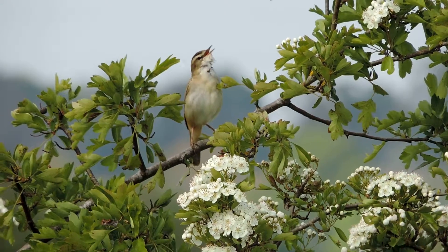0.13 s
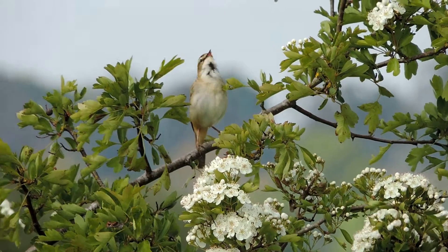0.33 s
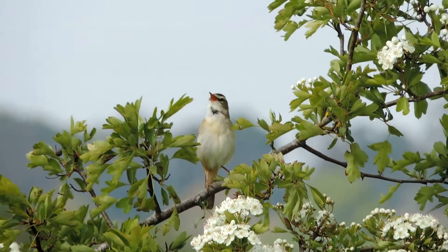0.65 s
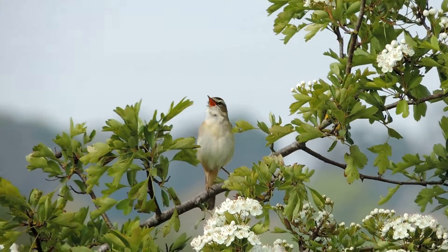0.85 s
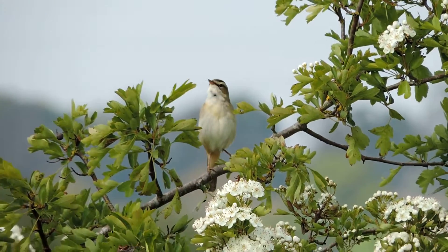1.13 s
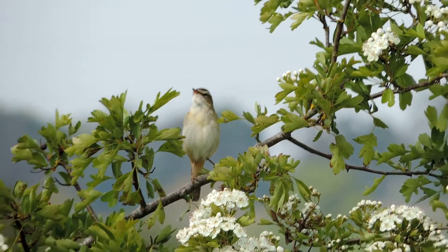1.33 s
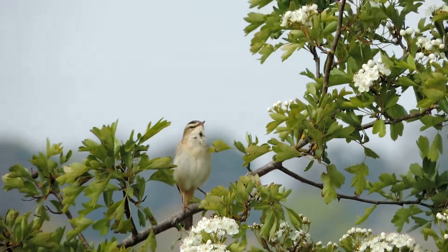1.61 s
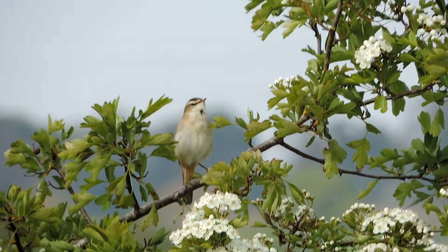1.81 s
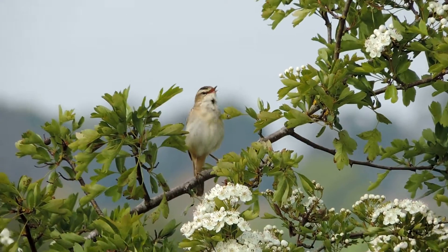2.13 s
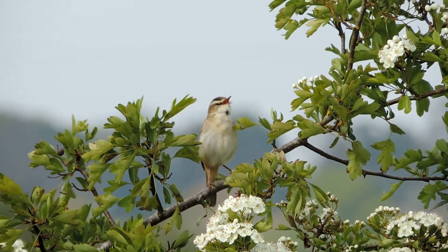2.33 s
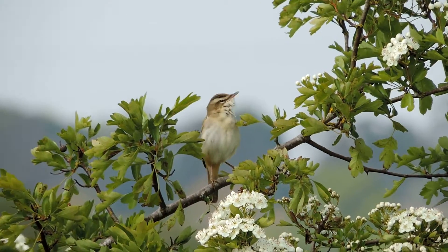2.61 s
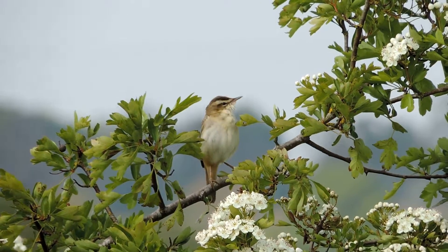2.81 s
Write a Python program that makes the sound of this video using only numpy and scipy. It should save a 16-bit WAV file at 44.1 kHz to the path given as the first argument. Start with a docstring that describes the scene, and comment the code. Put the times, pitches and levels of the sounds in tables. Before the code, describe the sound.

A small perched bird sings close by: falling chirps, then dry, harsh rattling bursts, a clear rising whistle and nasal notes. Low wind buffets the stereo microphone, stronger on the right, over faint far birds and soft hiss.

```python
"""On a bush in open fields a small bird sings rattles of harsh bursts, nasal notes, falling chirps and a whistle.
Rattles are uneven pulses and breath through open- and closed-beak filters; the other notes are gliding sines.
Far birds trill, pipe and peep, and long low calls and hoots drift over the fields, also as sines.
Filtered noise makes the wind that buffets two microphone ports, the right one most, and a soft country hiss."""
import sys
import numpy as np
from scipy import signal
from scipy.fft import rfft, irfft
from scipy.io import wavfile
from scipy.ndimage import uniform_filter1d

SR = 44100
rng = np.random.default_rng(int(sys.argv[2]) if len(sys.argv) > 2 else 0)


def volts_from_db(level):
    """Convert decibel levels to linear amplitude ratios."""
    exponent = np.asarray(level, float) / 20
    return 10 ** exponent


def output_pcm(signal):
    """Save a mono or channel-first signal as 16-bit PCM at the path in sys.argv[1].

    Samples are clipped to [-1, 1] before scaling.
    """
    pcm = np.clip(np.atleast_2d(signal).T, -1, 1) * 32767
    wavfile.write(sys.argv[1], SR, np.round(pcm).astype(np.int16))


N = 130095
T = np.arange(N) / SR
F = np.maximum(np.arange(N // 2 + 1) * SR / N, 1)

# Rattles. Each row: start in seconds, stretch of the gaps, level in dB before a common trim,
# first burst in dB re the rest, beak opening at the fourth burst (0-1), second-voice pitch in Hz.
RATTLES = [(.466, 1.07, -46.5, -1.5, 0.06, 5690), (.632, 0.94, -46, -7, 0.6, 6020),
           (1.024, 0.93, -48.5, -20, 0.52, 6090), (1.206, 0.97, -48.5, -8, 0.36, 6200),
           (1.734, 0.95, -50.5, -11, 0.55, 6290), (2.074, 0.98, -49, -20, 0.74, 6200),
           (2.291, 1.01, -50, -9, 0.08, 6150), (2.5041, 0.91, -49, -9, 0.1, 6400),
           (2.7154, 1.08, -50, -16, 0.16, 6440)]
# Burst starts within one rattle, in seconds before the stretch.
RATTLE_BURSTS = [0, .014, .029, .049, .072]
# Throat filters, beak open and beak closed. Each row: frequency in Hz, relative gain in dB.
OPEN_THROAT = [(1500, -11), (4000, -9), (4750, 1), (6200, -2), (8400, -8.5), (9300, -24), (11900, -19),
               (15300, -21)]
CLOSED_THROAT = [(1300, -6), (1900, 0.5), (3500, -1.5), (4900, -17), (6600, -46), (12000, -41)]
# Nasal notes. Each row: start in seconds, top pitch in Hz before wobble, level in dB.
NASAL_NOTES = [(0.044, 1227, -64), (1.42, 1249, -56), (1.575, 1243, -55), (1.942, 1248, -58)]
# Nasal harmonics: level in dB of multiples 1, 2, ..
NASAL_ORDERS_DB = [-38, -3, -8, 2.5, -2.5, -3.5, -11, -26, -16, -19, -28, -9.5]
# Whistle track. Each row: time in seconds, pitch in Hz before smoothing, level in dB.
WHISTLE_TRACK = [(0.787, 2690, -44.5), (.815, 2620, -50.5), (0.841, 3220, -54), (.868, 3350, -53.5),
                 (0.901, 3807, -55.5), (0.955, 3903, -61.5)]
# Whistle harmonics: level in dB of multiples 1, 2, ..
WHISTLE_ORDERS_DB = [0, -21, -31, -32]
# Chirps. Each row: start in seconds, level of the held top in dB, level of the fall in dB.
CHIRPS = [(.139, -60.5, -66), (.194, -63, -62), (.288, -65.5, -59.5), (0.343, -65, -59)]
# Far trills. Each row: start in seconds, level in dB.
TRILLS = [(0.967, -71), (1.129, -71.5), (1.311, -71.5)]
# Far piped notes. Each row: start in seconds, length in seconds, start pitch in Hz, end pitch in Hz, level in dB.
PIPES = [(.864, 0.032, 4900, 5650, -71), (1.523, 0.024, 1965, 2400, -61)]
# Far drooping peeps. Each row: start in seconds, top pitch in Hz, level in dB.
PEEPS = [(1.104, 2530, -65), (1.132, 2550, -63), (1.652, 2800, -64.5), (1.686, 2750, -65.5)]
# Long low calls. Each row: start in seconds, length in seconds, top pitch in Hz, level in dB.
FAR_CALLS = [(1.05, .43, 494, -66), (2.8, .4, 500, -67)]
# Low-call harmonics: level in dB of multiples 1, 2, ..
CALL_ORDERS_DB = [-17, 0, -7]
# Low far hoots. Each row: start in seconds, length in seconds, start pitch in Hz, end pitch in Hz, level in dB.
HOOTS = [(1.2, .31, 785, 847, -65), (1.62, .27, 790, 825, -65.5)]
# How the ports hear the birds. Each row: frequency in Hz, left minus right in dB, left phase lead in radians.
PORTS = [(2800, 2, 0.59), (3990, 13, 0.92), (4160, -12.5, 3.3), (4900, -14.5, 7.78), (8300, -1.5, 7.7),
         (12000, -6.5, 6)]
# Gust strength. Each row: time in seconds, level in dB before pan and buffeting.
GUST = [(0, -55), (.2, -43.5), (.37, -46), (.5, -39), (.57, -44.5), (0.626, -27), (.7, -35), (.91, -46),
        (1.12, -37), (1.321, -33.5), (1.39, -42), (1.429, -38.5), (1.52, -50), (1.64, -36), (1.72, -42.5),
        (1.785, -34), (1.84, -41), (2.07, -46.5), (2.149, -36.5), (2.23, -47), (2.471, -38), (2.59, -46.5),
        (2.67, -41), (2.95, -52)]
# Wind spectrum. Each row: frequency in Hz, relative gain in dB.
WIND_SPECTRUM = [(15, 2.5), (60, 6), (146, -6.5), (288, -23.5), (500, -38), (900, -78)]
# Hiss spectrum. Each row: frequency in Hz, relative gain in dB.
HISS_SPECTRUM = [(180, -21), (300, -8.5), (1130, -11), (2120, -18), (6000, -31.5), (9000, -55)]
# Hiss strength. Each row: time in seconds, level in dB.
HISS_CURVE = [(0, -70.5), (.55, -59.5), (2.95, -59.5)]
# Steady port noise. Each row: frequency in Hz, relative gain in dB.
SELF_NOISE = [(3000, 3.5), (13300, -4.5), (13800, -22)]

BURST_S, CLOSED_EXTRA_S, BURST_RISE_S = 0.0082, 0.0047, 0.0013
BURST_FADE_DB_PER_S, BURST_TRIM_DB, CLOSED_DB = 448, -6.5, 1
BUZZ_HZ, BUZZ_JITTER, BUZZ_SCATTER_DB, BREATH_DB = 1100, 0.12, 2, -8
BEAK_OPEN, BEAK_SHUT = 0.95, 0.03  # first three bursts, last burst
LEAD_S, LEAD_DB = 0.01095, 11  # burst that opens a nasal note
SECOND_S, SECOND_SAG, SECOND_DB = 0.04, 0.01, -19.5
NASAL_S, NASAL_ARCH, NASAL_WOBBLE, NASAL_RASP = 0.026, 0.035, 0.007, 0.4
HOLD_S, TOP_HZ, FALL_S, FALL_TO_HZ = 0.013, 4200, 0.012, 2200
REPEAT_S, REPEAT_FROM_HZ, REPEAT_DROP_DB, RAGGED_DB = 0.008, 3800, -2.5, 1.5
TRILL_S, TRILL_FROM_HZ, TRILL_TO_HZ = 0.095, 5340, 4900
WARBLE_HZ, WARBLE_SWING_HZ = 233, 450
PEEP_S, PEEP_DROOP = 0.026, 0.185
CALL_ARCH, CALL_FLUTTER_DB = 0.06, 4.5
ECHO_DB, ECHO_T60_S = -12, 0.086
WIND_PAN_DB, BUFFET_DB, BUFFET_PER_S = -8.5, 1.8, 40  # pan: left minus right
BRIGHTEN_DB_PER_DB, CALM_DB = 0.65, -43.5
ALIKE, ALIKE_HZ = 0.33, 1150  # likeness of the sides, fading above this
SELF_DB = -66.5


def along(table, col=1):
    """A table column over log frequency."""
    rows = np.array(table, float)
    return np.interp(np.log(F), np.log(rows[:, 0]), rows[:, col])


def colour(x, table):
    """Filter by (Hz, dB) points; white input keeps its rms."""
    gain = volts_from_db(along(table))
    return irfft(rfft(x) * gain / np.sqrt(np.mean(gain ** 2)), N)


def walk(rate_hz):
    """Smooth random level, spread near 1."""
    k = int(SR / rate_hz)
    steps = np.repeat(rng.standard_normal(N // k + 1), k)
    return 1.49 * uniform_filter1d(uniform_filter1d(steps, k), k)[:N]


def gate(start_s, length_s, edge_s):
    """Rises over one edge, holds, falls over the other."""
    to_end = np.minimum(T - start_s, start_s + length_s - T)
    return np.sin(np.pi / 2 * np.clip(to_end / edge_s, 0, 1)) ** 2


def voice(hz, orders_db=(0,)):
    """Multiples of a pitch track as sines; 0 dB is rms 1."""
    phase = 2 * np.pi * np.cumsum(hz) / SR
    return sum(volts_from_db(db) * np.sqrt(2) * np.sin((k + 1) * phase + k * k) for k, db in enumerate(orders_db))


def notes(table, edge=0.087, swing_hz=0.0):
    """Gliding sine notes with soft ends; edge is a fraction of the length."""
    out = 0
    for t, n, from_hz, to_hz, db in table:
        glide = np.interp(T, [t, t + n], [from_hz, to_hz])
        out = out + volts_from_db(db) * gate(t, n, edge * n) * voice(glide + swing_hz)
    return out


def buzz():
    """Unevenly spaced pulses of scattered strength, plus breath noise."""
    chance = rng.standard_normal((int(1.5 * BUZZ_HZ * N / SR), 2))
    gaps = np.clip(1 + BUZZ_JITTER * chance[:, 0], 0.3, 3)
    at = (np.cumsum(gaps) * SR / BUZZ_HZ).astype(int)
    pulses = np.sqrt(SR / BUZZ_HZ) * volts_from_db(BUZZ_SCATTER_DB * chance[:, 1])
    out = volts_from_db(BREATH_DB) * rng.standard_normal(N)
    out[at[at < N]] += pulses[at < N]
    return out


def rattles():
    """Buzz gated into fading bursts, shared between an open and a closed throat."""
    bursts = []
    for t, stretch, db, first_db, fourth, _ in RATTLES:
        beaks = (BEAK_OPEN, BEAK_OPEN, BEAK_OPEN, fourth, BEAK_SHUT)
        for s, beak in zip(RATTLE_BURSTS, beaks):
            bursts.append((t + stretch * s, db + first_db * (s == 0), beak))
    bursts += [(t - LEAD_S, db + LEAD_DB, 1) for t, _, db in NASAL_NOTES]
    wide, shut = 0, 0
    for t, db, beak in bursts:
        env = volts_from_db(db + BURST_TRIM_DB) * gate(t, BURST_S + CLOSED_EXTRA_S * (1 - beak), BURST_RISE_S)
        env = env * volts_from_db(-BURST_FADE_DB_PER_S * np.clip(T - t, 0, 1))
        wide = wide + np.sqrt(beak) * env
        shut = shut + np.sqrt(1 - beak) * env
    source = buzz()
    return colour(source * wide, OPEN_THROAT) + volts_from_db(CLOSED_DB) * colour(source * shut, CLOSED_THROAT)


def second_voice():
    """A thin sagging tone under the first half of each rattle."""
    rows = [(t, SECOND_S * stretch, hz * (1 + SECOND_SAG / 2), hz * (1 - SECOND_SAG / 2), db + SECOND_DB)
            for t, stretch, db, _, _, hz in RATTLES]
    return notes(rows, 0.084, 150 * walk(90)) * volts_from_db(4.1 * walk(140))


def nasal():
    """A rich, raspy harmonic stack whose pitch arches and sags at the end."""
    wobble = 1 + NASAL_WOBBLE * walk(300)
    rasp = 1 + NASAL_RASP * walk(1500)
    out = 0
    for t, hz, db in NASAL_NOTES:
        arch = 1 - NASAL_ARCH * np.clip((T - t) / NASAL_S * 2 - 0.8, -1, 1.3) ** 2
        out = out + volts_from_db(db) * gate(t, NASAL_S, 0.22 * NASAL_S) * voice(hz * wobble * arch, NASAL_ORDERS_DB)
    return rasp * out


def whistle():
    """One clear rising note with weak harmonics."""
    s, hz, db = np.array(WHISTLE_TRACK).T
    pitch = uniform_filter1d(np.interp(T, s, hz), size=SR // 50)
    env = volts_from_db(np.interp(T, s, db)) * gate(s[0], s[-1] - s[0], 0.011)
    return env * voice(pitch, WHISTLE_ORDERS_DB)


def chirps():
    """Held top, fast fall, three ragged repeats of the fall."""
    tops = notes([(t, HOLD_S, 0.97 * TOP_HZ, TOP_HZ, db) for t, db, _ in CHIRPS], 0.27)
    falls = notes([(t + HOLD_S - FALL_S / 10, FALL_S, TOP_HZ, FALL_TO_HZ, db) for t, _, db in CHIRPS], 0.22)
    rows = [(t + HOLD_S + k * REPEAT_S, FALL_S, REPEAT_FROM_HZ, FALL_TO_HZ, db + k * REPEAT_DROP_DB)
            for t, _, db in CHIRPS for k in (1, 2, 3)]
    repeats = notes(rows, 0.35, 200 * walk(300)) * (1 + walk(900))
    return (tops + falls + repeats) * volts_from_db(RAGGED_DB * walk(250))


def far_trills():
    """Falling notes warbled fast in pitch and level."""
    beat = 2 * np.pi * WARBLE_HZ * T
    rows = [(t, TRILL_S, TRILL_FROM_HZ, TRILL_TO_HZ, db) for t, db in TRILLS]
    return notes(rows, 0.18, WARBLE_SWING_HZ * np.sin(beat)) * (1 + 0.33 * np.cos(beat))


def far_pipes():
    """Short rising sines, unsteady in pitch and level."""
    return notes(PIPES, swing_hz=40 * walk(80)) * volts_from_db(4.3 * walk(76))


def peeps():
    """Short grainy sines that hold, then droop."""
    out = 0
    for t, hz, db in PEEPS:
        droop = 1 - PEEP_DROOP * np.clip((T - t) / PEEP_S, 0, 1) ** 2
        out = out + volts_from_db(db) * gate(t, PEEP_S, 0.0047) * voice(hz * droop)
    return (1 + 0.5 * walk(400)) * out


def far_calls():
    """Long fluttering harmonic notes whose pitch arches."""
    out = 0
    for t, n, hz, db in FAR_CALLS:
        arch = 1 - CALL_ARCH * np.clip((T - t) / n * 2 - 1, -1, 1) ** 2
        out = out + volts_from_db(db) * gate(t, n, 0.024) * voice(hz * arch, CALL_ORDERS_DB)
    return volts_from_db(CALL_FLUTTER_DB * walk(24.97)) * out


def hoots():
    """Low, slightly rising sines with a fluttering level."""
    return notes(HOOTS, swing_hz=9 * walk(13)) * volts_from_db(CALL_FLUTTER_DB * walk(30.02))


def wind():
    """Each port has its own turbulence noise; upper wind grows faster than the gust."""
    s, db = np.array(GUST).T
    high = 1 / (1 + (130 / F) ** 4)
    out = []
    for side in (1, -1):  # left, right
        gust_db = np.interp(T, s, db) + side * WIND_PAN_DB / 2 + BUFFET_DB * walk(BUFFET_PER_S)
        air = rfft(colour(rng.standard_normal(N), WIND_SPECTRUM))
        lower = irfft(air * (1 - high), N)
        upper = irfft(air * high, N) * volts_from_db(BRIGHTEN_DB_PER_DB * (gust_db - CALM_DB))
        out.append(volts_from_db(gust_db) * (lower + upper))
    return np.array(out)


def hiss():
    """Leaves and distant country as noise partly alike in both ports, plus steady port noise."""
    s, db = np.array(HISS_CURVE).T
    alike = ALIKE / np.sqrt(1 + (F / ALIKE_HZ) ** 2)
    mid, side = (rfft(colour(rng.standard_normal(N), HISS_SPECTRUM)) for _ in range(2))
    mid, side = mid * np.sqrt(1 + alike), side * np.sqrt(1 - alike)
    country = np.array([irfft(mid + k * side, N) for k in (1, -1)])
    own = np.array([colour(rng.standard_normal(N), SELF_NOISE) for _ in range(2)])
    return country * volts_from_db(np.interp(T, s, db) + 0.17 * walk(5.2)) + volts_from_db(SELF_DB) * own


def through_ports(birds):
    """Adds decaying leaf scatter, then the level and phase differences of the two ports."""
    tail = np.arange(int(0.25 * SR)) / SR
    out = []
    for side in (1, -1):  # left, right
        leaves = rng.standard_normal(len(tail)) * volts_from_db(-60 * tail / ECHO_T60_S) * (tail > 0.003)
        leaves = leaves / np.sqrt(np.sum(leaves ** 2))
        wet = birds + volts_from_db(ECHO_DB) * signal.fftconvolve(birds, leaves)[:N]
        port = volts_from_db(side * along(PORTS) / 2) * np.exp(0.5j * side * along(PORTS, col=2))
        out.append(irfft(rfft(wet) * port, N))
    return np.array(out)


def scene():
    """Birds through the ports, over far calls, hoots, wind and hiss."""
    birds = rattles() + second_voice() + nasal() + whistle() + chirps()
    birds = birds + far_trills() + far_pipes() + peeps()
    return through_ports(birds) + far_calls() + hoots() + wind() + hiss()


def top_cut(x):
    """Nothing passes above the cut-off."""
    return signal.sosfilt(signal.butter(12, 15890, fs=SR, output="sos"), x)


def record(dry):
    """Output stage for the finished stereo mix."""
    return top_cut(dry)


dry = scene()
out = record(dry)
output_pcm(out)
```